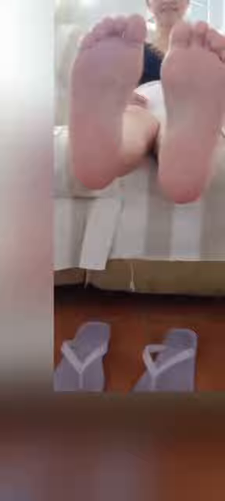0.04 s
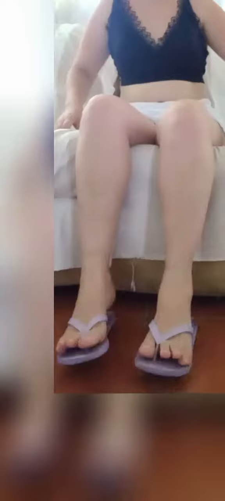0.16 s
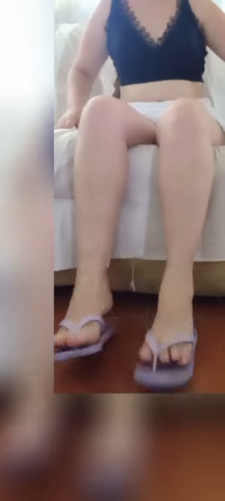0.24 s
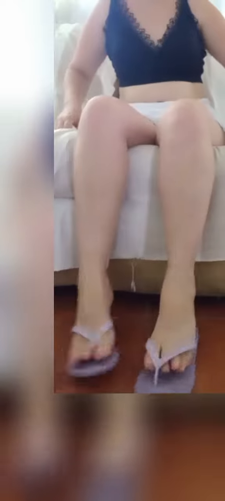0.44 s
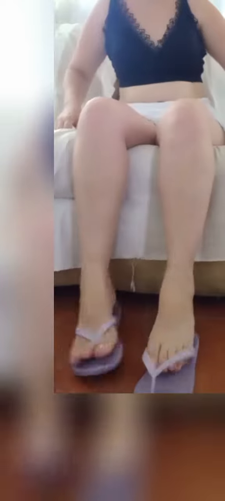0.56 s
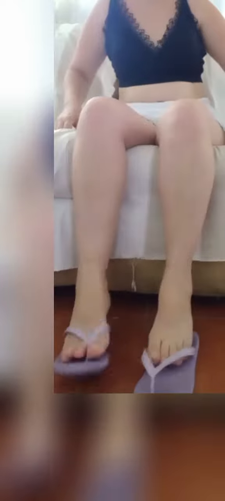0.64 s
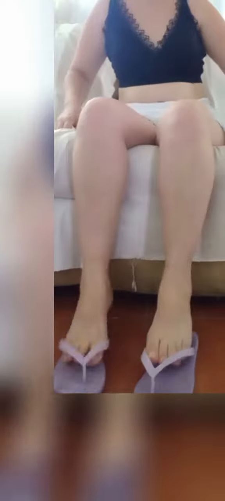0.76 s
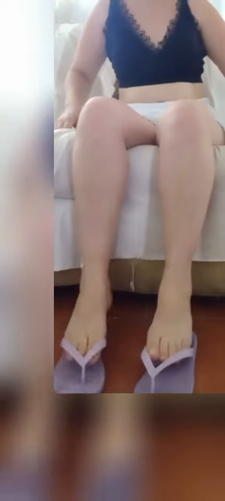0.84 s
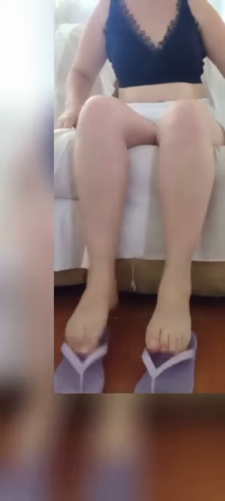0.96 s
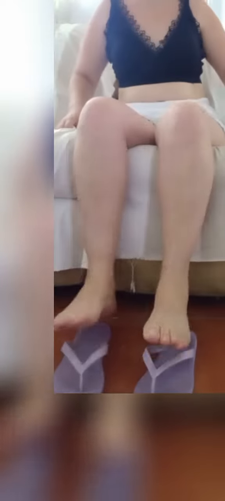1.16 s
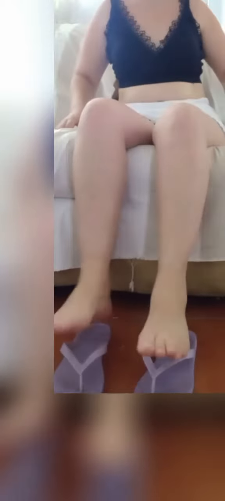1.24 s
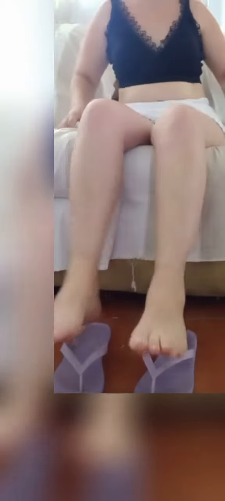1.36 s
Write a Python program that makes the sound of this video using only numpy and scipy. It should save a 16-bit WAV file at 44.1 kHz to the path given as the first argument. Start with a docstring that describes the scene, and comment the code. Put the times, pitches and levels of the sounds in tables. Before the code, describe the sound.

Flip-flops land on floorboards in a quick, uneven run of hollow thumps and slaps, mixed with skin scuffing on rubber. The taps thin out into quiet room noise, heard close by in a small, fairly live room.

```python
"""A small, fairly live room with a wooden floor, where feet shuffle out of rubber flip-flops.
Each landing sole traps air in a short hollow thump and sets the boards rumbling; flat contacts add
a slap, and sliding friction of skin on rubber makes brief scuffs. A quiet room rumble and a faint
ringing tone lie behind. The microphone pair stands a little to the left of the feet."""
import sys
import numpy as np
from scipy import signal
from scipy.fft import rfft, irfft, next_fast_len
from scipy.io import wavfile
from scipy.ndimage import uniform_filter1d

SR = 44100
rng = np.random.default_rng(int(sys.argv[2]) if len(sys.argv) > 2 else 0)


def store_pcm(level_fs):
    """Save levels as 16-bit WAV."""
    pcm = np.round(np.clip(level_fs, -1, 1) * 32767).astype(np.int16)
    wavfile.write(sys.argv[1], SR, np.atleast_2d(pcm).T)


N = 61739


def undb(db):
    """Decibels to amplitude ratio."""
    return 10 ** (np.asarray(db) / 20)


def unit(x):
    """Normalise to an rms of 1."""
    return x / np.sqrt(np.mean(x ** 2))


def by_hz(points, freq_hz):
    """Interpolate rows of (frequency_hz, value) on a logarithmic frequency axis."""
    hz, value = np.array(points).T
    return np.interp(np.log(freq_hz + 1), np.log(hz), value)


def colour(x, points):
    """Minimum-phase filter through rows of (frequency_hz, gain_db)."""
    size = 2 * next_fast_len(N)
    gain = undb(by_hz(points, np.fft.rfftfreq(size, 1 / SR)))
    cepstrum = irfft(np.log(gain))
    cepstrum[1:size // 2] *= 2  # folding onto positive time makes the filter causal
    cepstrum[size // 2 + 1:] = 0
    return irfft(rfft(x, size) * np.exp(rfft(cepstrum)))[..., :N]


def soften(x, edge_hz):
    """Steep low-pass: a soft contact excites little above its edge frequency."""
    lowpass = signal.butter(6, min(edge_hz, SR / 2 - 1000), fs=SR, output="sos")
    return signal.sosfilt(lowpass, x + 1e-18)


def walk(rate_hz):
    """Slow random modulation: twice-averaged noise with an rms of 1."""
    width = max(int(SR / rate_hz), 1)
    return unit(uniform_filter1d(uniform_filter1d(rng.standard_normal(N), width), width))


def diffuse_field(bass_coherence=0.76, corner_hz=860):
    """Spatial coherence: long waves reach both microphones alike, short waves unrelated."""
    coherence = bass_coherence / (1 + (np.fft.rfftfreq(N, 1 / SR) / corner_hz) ** 2)
    mid, side = rfft(rng.standard_normal((2, N)))
    mid, side = mid * np.sqrt(1 + coherence), side * np.sqrt(1 - coherence)
    return unit(irfft(np.array([mid + side, mid - side]), N))


def contact_noise(unshared_db=1):
    """Partial correlation: one noise common to both microphones plus each one's own."""
    return unit(rng.standard_normal(N) + undb(unshared_db) * rng.standard_normal((2, N)))


def room_rumble(level_db=-39):
    """Ambient noise: a steady diffuse field, strongest in the bass."""
    # background spectrum: frequency_hz, gain_db
    spectrum = [(25, -12), (45, -14), (80, 4.5), (160, -5.5), (240, -4.5), (400, -6.5), (620, 0), (900, -9),
                (1300, -8.5), (2000, -13), (3000, -20), (4500, -24.5), (9000, -30.5), (14000, -26.5)]
    return unit(colour(diffuse_field(), spectrum)) * undb(level_db)


def faint_tone(t, pitch_hz=664, waver=0.0082, flutter_db=3.34, octave_db=-17.5):
    """Random frequency and amplitude modulation make a brief tone and its octave flutter."""
    # envelope of the tone: time_s, level_db
    envelope = [(1.045, -58), (1.075, -32.5), (1.114, -32), (1.129, -46), (1.18, -42), (1.24, -38.5),
                (1.278, -54)]
    time_s, level_db = np.array(envelope).T
    phase = 2 * np.pi * np.cumsum(pitch_hz * (1 + waver * walk(52))) / SR
    envelope_db = np.interp(t, time_s, level_db, left=-np.inf, right=-np.inf)
    gain = undb(envelope_db + flutter_db * walk(73))
    return gain * unit(np.sin(phase) + undb(octave_db) * np.sin(2 * phase))


def reverberation(t, source, gain_db=-5.5, build_s=0.0019):
    """Reflections build a diffuse tail that decays exponentially, most slowly in the bass."""
    # reverberation time: frequency_hz, t60_s
    decay_times = [(100, 1), (400, 0.29), (1500, 0.51), (4000, 0.29), (12000, 0.33)]
    # colouring of the reflections: frequency_hz, gain_db
    spectrum = [(60, -12.5), (150, -7.5), (350, 0.5), (650, 4.5), (1000, -1), (2000, 1), (3500, -3),
                (6000, 2), (14000, 3.5)]
    freq_hz, frame_s, bands = signal.stft(diffuse_field(), SR, nperseg=256)
    fade = np.exp(-np.log(1000) * frame_s / by_hz(decay_times, freq_hz)[:, None])
    build_up = 1 - np.exp(-(t / build_s) ** 2)
    tail = signal.istft(bands * fade, SR)[1][:, :N] * build_up
    response = undb(gain_db) * tail / np.linalg.norm(tail[0])
    return colour(signal.fftconvolve(source, response, axes=1)[:, :N], spectrum)


def floorboards(t, blows, gain_db=-17, decay_s=0.074):
    """Free vibration: the wooden floor rumbles on after each blow."""
    # response of the boards: frequency_hz, gain_db
    spectrum = [(40, -13), (80, -4.5), (120, 7), (170, -8), (240, -13), (400, -20.5), (900, -23.5)]
    ring = colour(rng.standard_normal(N), spectrum) * np.exp(-t / decay_s)
    return undb(gain_db) * signal.fftconvolve(blows, ring / np.linalg.norm(ring))[:N]


def scuffs(t, grain_db=2.5, grip_db=2):
    """Sliding friction: skin grips rubber unevenly, making grainy noise that swells and fades."""
    # slides: peak_s, level_db, rise_s, fall_s, upper_edge_hz
    slides = [(0.17, -34.5, 0.012, 0.011, 2690), (0.238, -32.5, 0.013, 0.018, 3970),
              (0.249, -41.5, 0.048, 0.035, 15000), (0.335, -34, 0.011, 0.015, 14900),
              (0.378, -28, 0.019, 0.018, 15000), (0.472, -31, 0.014, 0.011, 15200),
              (0.555, -34, 0.033, 0.022, 15300), (0.699, -29, 0.019, 0.013, 15500),
              (0.777, -42, 0.018, 0.078, 15200), (0.925, -41, 0.018, 0.06, 14700),
              (0.981, -37, 0.012, 0.0071, 14600)]
    # friction spectrum: frequency_hz, gain_db
    spectrum = [(500, -23), (1500, -17.5), (2200, -1), (2700, 0), (3600, 1), (5200, -6), (7000, -11),
                (9500, -16.5), (13500, -7.5), (16000, -15)]
    rough = contact_noise() * undb(grain_db * walk(360) + grip_db * walk(49))
    friction = unit(colour(rough, spectrum))
    out = np.zeros((2, N))
    for peak_s, level_db, rise_s, fall_s, upper_edge_hz in slides:
        width_s = np.where(t < peak_s, rise_s, fall_s)
        swell = np.exp(-((t - peak_s) / width_s) ** 2 / 2)
        out += undb(level_db) * swell * soften(friction, upper_edge_hz)
    return out


def slaps(t, snap_s=0.00039):
    """Impact of skin, rubber and wood: mostly one pulse if briefer than snap_s, else mostly crackle."""
    # flat contacts: start_s, level_db, decay_s, lower_edge_hz, upper_edge_hz
    contacts = [(0.2165, -14.5, 0.0014, 704, 1770), (0.2160, -14.5, .0007, 1960, 3900),
                (0.535, -24, 0.0013, 600, 1270), (0.6012, -16.5, 0.0016, 2200, 11000),
                (0.6655, -5, 0.00027, 440, 1310), (0.6653, -13.5, 0.001, 2280, 6460),
                (0.7550, -23.5, 0.0025, 2590, 13300), (0.7852, -16.5, 0.0012, 2980, 13300),
                (0.7894, -10, 0.0016, 2360, 12400), (0.7978, -1.5, 0.00064, 465, 7260),
                (0.8073, -17.5, 0.00066, 2500, 5530), (0.9040, -21, 0.00025, 1500, 9150),
                (0.9248, -26.5, 0.00095, 2510, 5550), (0.9682, -17.5, 0.0062, 2790, 8900),
                (0.972, -11, 0.00027, 2650, 14000), (1.019, -24.5, 0.00091, 596, 4070),
                (1.0262, -23.5, 0.00093, 550, 890), (1.3499, -34, 0.0032, 880, 3120)]
    # impact spectrum: frequency_hz, gain_db
    spectrum = [(200, -44), (600, 1), (1200, 7), (1900, -1.5), (2700, 2.5), (4800, -7.5), (6500, -18),
                (10000, -18.5), (14500, -15)]
    out = np.zeros((2, N))
    for start_s, level_db, decay_s, lower_edge_hz, upper_edge_hz in contacts:
        envelope = (t >= start_s) * np.exp(-np.abs(t - start_s) / decay_s)
        strength = np.linalg.norm(envelope)
        pulse_share = snap_s / (snap_s + decay_s)
        crack = np.sqrt(1 - pulse_share) * envelope * contact_noise()
        crack[:, np.argmax(envelope)] += np.sqrt(pulse_share) * strength
        highpass = signal.butter(2, lower_edge_hz, "high", fs=SR)  # small contacts sound thin
        crack = colour(signal.lfilter(*highpass, soften(crack, upper_edge_hz)), spectrum)
        out += undb(level_db) * strength * crack / np.linalg.norm(crack, axis=1, keepdims=True)
    return out


def thumps(t, sag=0.24, sag_s=0.0037, low_cut_hz=129):
    """Damped oscillation of air trapped under a sole: the pitch sags as the contact spreads."""
    # soles landing: start_s, pitch_hz, level_db, rise_s, decay_s
    landings = [(0.2025, 557, -20.5, 0.00024, 0.005), (0.2159, 367, -10, 0.00042, 0.0047),
                (0.2777, 306, -22.5, 0.0018, 0.0048), (0.332, 274, -17.5, 0.0015, 0.0034),
                (0.5325, 727, -20, 0.0036, 0.0058), (0.5366, 333, -14, 0.0045, 0.0017),
                (0.6007, 333, -18.5, 0.0049, 0.0019), (0.6137, 417, -8.5, 0.0025, 0.0014),
                (.649, 648, -20, .002, .003), (0.6655, 258, -7.5, 0.00082, 0.0024),
                (0.679, 202, -31, 0.0013, 0.0041), (0.753, 552, -16.5, 0.00061, 0.003),
                (0.7850, 271, -11.5, 0.0013, 0.0037), (0.7900, 297, -11.5, 0.0015, 0.0014),
                (0.7985, 494, -2, 0.00024, 0.0016), (1.0173, 275, -19.5, 0.00059, 0.0024),
                (1.0261, 363, -9.5, 0.00081, 0.0013), (1.3620, 235, -33.5, 0.0019, 0.015)]
    out = np.zeros(N)
    for start_s, pitch_hz, level_db, rise_s, decay_s in landings:
        age = np.maximum(t - start_s, 0)
        envelope = np.minimum(age / rise_s, 1) * np.exp(-np.maximum(age - rise_s, 0) / decay_s)
        # the glide runs from half the sag above pitch_hz to half the sag below
        cycles = pitch_hz * ((1 - sag / 2) * age + sag * sag_s * (1 - np.exp(-age / sag_s)))
        out += undb(level_db) * envelope * np.sin(2 * np.pi * cycles)
    return signal.lfilter(*signal.butter(2, low_cut_hz, "high", fs=SR), out)


def scene(left_lag_s=0.00027, pan_db=2.5, start_s=0.15, fade_in_s=0.011):
    """Superposition of feet and room; the direct sound reaches the right microphone first and louder."""
    t = np.arange(N) / SR
    blows = thumps(t)
    feet = blows + slaps(t) + scuffs(t)
    left = np.roll(feet[0], int(left_lag_s * SR)) * undb(-pan_db / 2)
    right = feet[1] * undb(pan_db / 2)
    rumble = room_rumble()
    sound = np.array([left, right]) + reverberation(t, feet) + floorboards(t, blows)
    sound += faint_tone(t) + rumble
    return sound * np.clip((t - start_s) / fade_in_s, 0, 1)


def record(dry, low_cut_hz=39, top_hz=15600):
    """Band limiting: the deepest bass is removed, peaks clip at full scale and the top is cut."""
    thinned = signal.lfilter(*signal.butter(2, low_cut_hz, "high", fs=SR), dry)
    lowpass = signal.ellip(10, 0.2, 80, top_hz, fs=SR, output="sos")
    return signal.sosfilt(lowpass, np.clip(thinned, -1, 1))


dry = scene()
out = record(dry)
store_pcm(out)
```